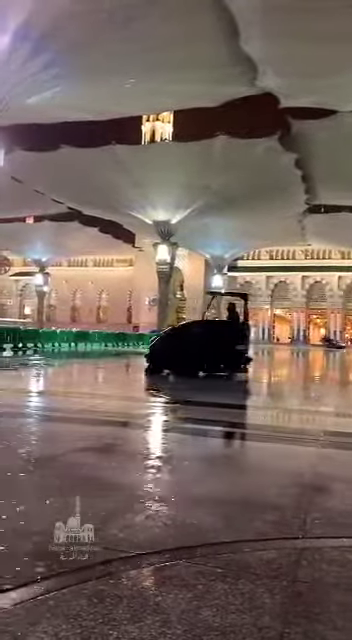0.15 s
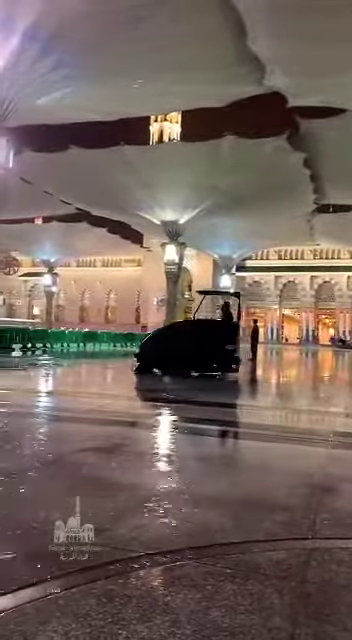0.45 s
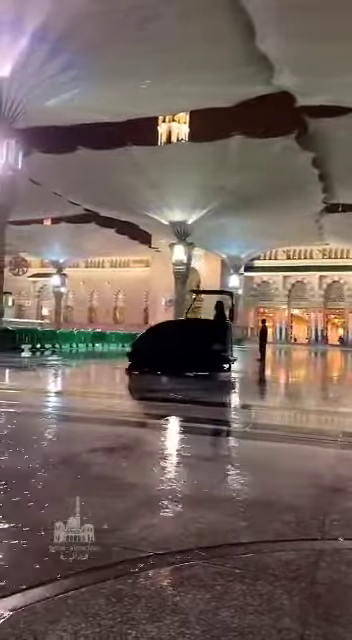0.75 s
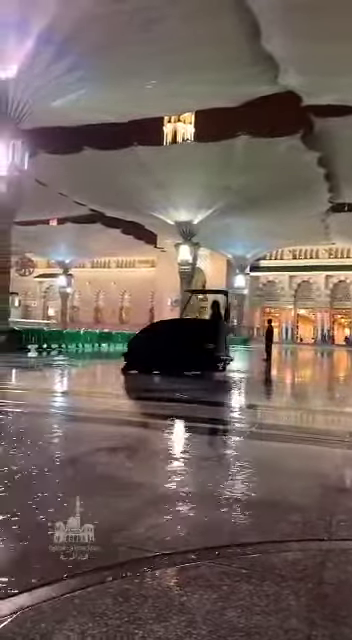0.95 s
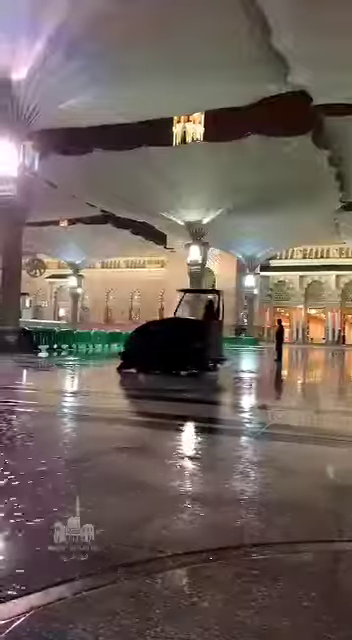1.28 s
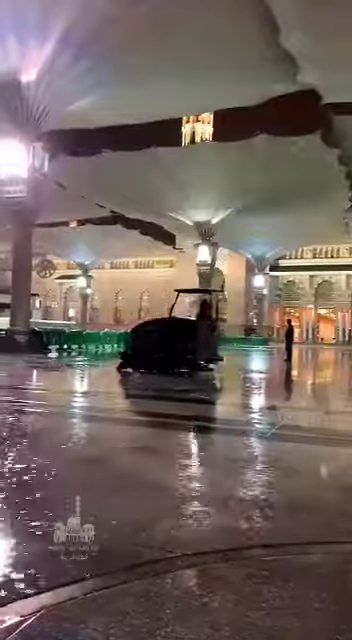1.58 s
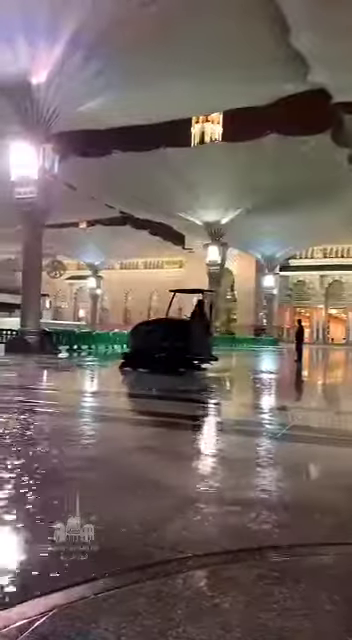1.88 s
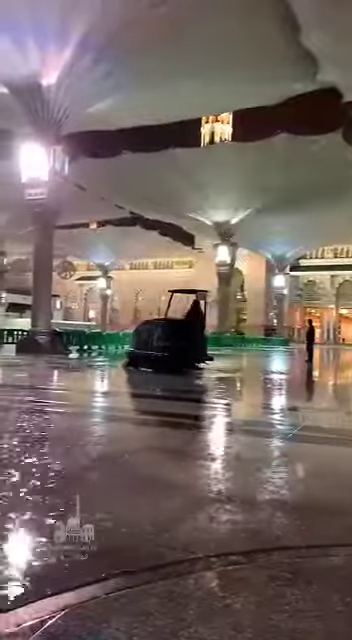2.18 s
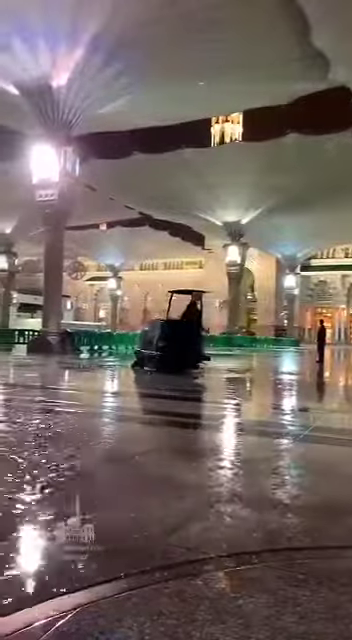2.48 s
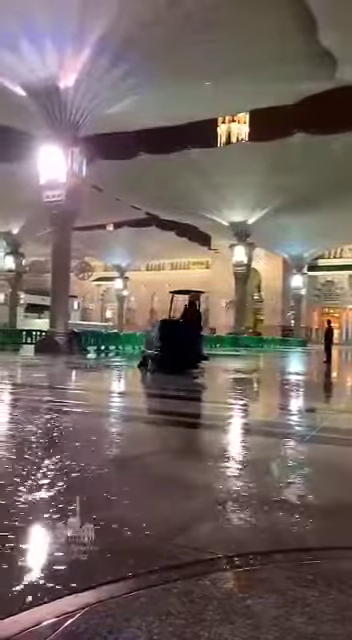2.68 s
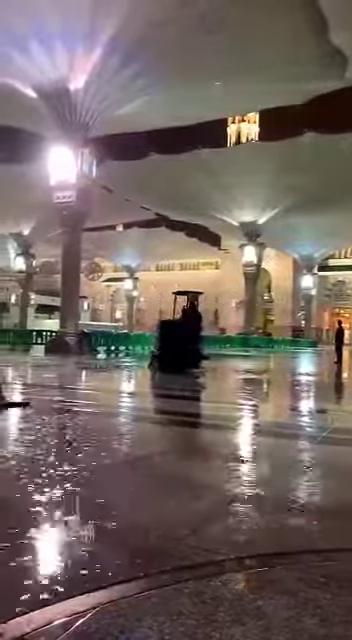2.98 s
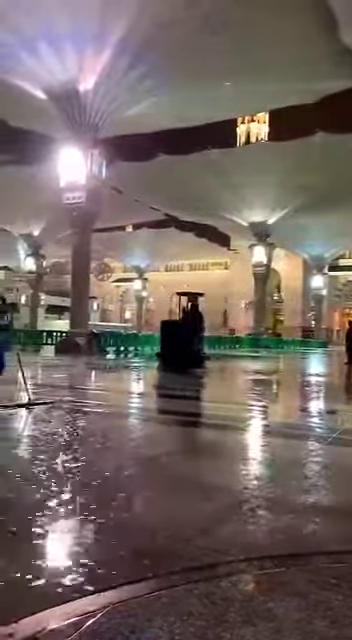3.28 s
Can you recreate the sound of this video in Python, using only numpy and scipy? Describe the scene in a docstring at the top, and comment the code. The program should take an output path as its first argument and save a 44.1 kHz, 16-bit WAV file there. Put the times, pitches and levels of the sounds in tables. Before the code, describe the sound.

Low engine drone with a beating pump and broad suction roar from a scrubber turning away on wet paving under a canopy, soft wheel rumbles midway, fine drips near a two-port microphone.

```python
"""A ride-on floor scrubber turns away across a wet paved courtyard under a wide canopy. From the start its engine
drones on twelve firing orders, a belt-driven pump beats against the fourth, a fan and thin steady electric whines
sound faintly, brushes, suction and water hiss, and drops tick nearby. The fan fades after the turn begins; the
engine sags until 1.65 s, with wheel rumbles from 0.85 s, then recovers by 2.3 s and sags again. The wash thins from
2.5 s and the loudest drop lands at 3.32 s. Two close microphone ports hear a common part and an opposite part."""
import sys
import numpy as np
from scipy import signal
from scipy.fft import rfft, irfft, next_fast_len
from scipy.io import wavfile
from scipy.ndimage import uniform_filter1d, map_coordinates

SR = 44100
rng = np.random.default_rng(int(sys.argv[2]) if len(sys.argv) > 2 else 0)


def volts_from_db(level):
    """Convert decibel levels to linear amplitude ratios."""
    exponent = np.asarray(level, float) / 20
    return 10 ** exponent


def wav_out(sig):
    """Save sig, one row per channel (or a flat mono array), as 16-bit PCM at SR to the path in sys.argv[1]."""
    wavfile.write(sys.argv[1], SR, np.round(np.clip(np.atleast_2d(sig).T, -1, 1) * 32767).astype(np.int16))


N = 152145
T = np.arange(N) / SR


def unit(x):
    """Scale to rms 1."""
    return x / np.sqrt(np.mean(x ** 2) + 1e-20)


def along(points, hz):
    """Read (frequency [Hz], value) points on a log frequency axis."""
    f, v = np.transpose(points)
    return np.interp(np.log(hz + 1), np.log(f + 1), v)


def curves(rows):
    """One value per sample for each column after the time."""
    s, *cols = np.transpose(rows)
    return [np.interp(T, s, c) for c in cols]


def wobble(rate):
    """A smooth random curve, rate knots a second."""
    return map_coordinates(rng.standard_normal(400), [T * rate])


def swell(centre_s, length_s, power=2):
    """A bell-shaped envelope, down to 1/e at length_s either side of its centre."""
    return np.exp(-((T - centre_s) / length_s) ** power)


def filtered(x, response):
    """Filter x by a complex response of frequency."""
    m = next_fast_len(N + 8192)
    return irfft(rfft(x, m) * response(np.fft.rfftfreq(m, 1 / SR)), m)[..., :N]


def patches(x, size, bins, frames, depth_db):
    """Random gain patches, so many bins high and frames long."""
    z = signal.stft(x, nperseg=size)[2]
    field = rng.standard_normal(z.shape)
    field = uniform_filter1d(field, size=bins, axis=0)
    field = uniform_filter1d(field, size=frames, axis=1)
    return signal.istft(z * volts_from_db(depth_db * unit(field)), nperseg=size)[1][:N]


def rush(spectrum, patchy_db, stripes_db):
    """Coloured noise of rms 1: brief broad patches, and narrow lasting stripes from the canopy's reflections."""
    x = patches(rng.standard_normal(N), size=512, bins=4, frames=14, depth_db=patchy_db)
    x = patches(x, size=2048, bins=2, frames=30, depth_db=stripes_db)
    return unit(filtered(x, lambda hz: volts_from_db(along(spectrum, hz))))


# Firing orders 5 to 12: one level each [dB], before fade and waver
UPPER_ORDERS = [-32, -35, -39, -38, -35, -40, -40, -39]


def firing_pulses(turn, order_db, fade_db):
    """Twelve firing orders nearly in step make one pulse a cycle."""
    second_db, third_db, fourth_db = order_db
    first_db = -22 + fade_db + 2.1 * wobble(5.9)
    levels_db = [db + 0.2 * wobble(8.2) for db in (first_db, second_db, third_db)]
    levels_db.append(fourth_db)
    # the upper orders come and go
    levels_db += [db + fade_db + 2.2 * wobble(4) for db in UPPER_ORDERS]
    pulses = 0
    for order, db in enumerate(levels_db, 1):
        phase_waver = (.15 if order == 4 else .45) * wobble(8)  # radians
        pulses = pulses - volts_from_db(db) * np.cos(order * turn + phase_waver)
    return pulses


def pump(turn, pump_db):
    """The belt-driven pump runs just above four times the firing rate, so it beats with the fourth order."""
    ratio, start_turns = 4.0919, .37
    return volts_from_db(pump_db) * np.cos(ratio * turn + 2 * np.pi * start_turns)


def fan(turn):
    """The fan whine follows the engine speed and faces away after the turn begins."""
    level = volts_from_db(-25.5 + 2.2 * wobble(8.98)) * swell(.5, 0.94, power=4)
    return level * np.cos(6.41 * turn + 0.83 * wobble(14))


def exhaust_pipe(x):
    """The pipe's open end turns the phase of what lies below its cut and leaves levels alone."""
    cut_hz = 84
    return filtered(x, lambda f: np.exp(1j * np.angle(-1 / (cut_hz ** 2 - f * f + 1j * f * cut_hz / 2))))


# Engine, its orders swelling and fading in the standing waves under the canopy: (time [s], firing rate [Hz],
# 2nd order level [dB], 3rd order level [dB], 4th order level [dB], pump level [dB])
ENGINE_COURSE = [(0, 64.26, -14.5, -21.5, -25, -22.5), (.15, 64.5, -12, -16, -22.5, -31.5),
                 (.42, 64.63, -13, -15.5, -23.5, -29), (.7, 63.55, -19, -18, -22, -26),
                 (1.0, 62.92, -15, -17, -20, -23.5), (1.3, 61.36, -15.5, -18.5, -18, -23.5),
                 (1.65, 60.51, -14.5, -20, -19.5, -20.5), (1.92, 61.0, -19.5, -14, -26.5, -23),
                 (2.0, 61.34, -17, -17, -22.5, -18), (2.23, 64.44, -16.5, -18, -26, -24),
                 (2.33, 64.74, -10.5, -22, -21.5, -31), (2.47, 64.7, -21.5, -21, -21.5, -33),
                 (2.58, 64.48, -18.5, -17, -32, -32), (2.68, 63.76, -19, -26, -24, -31),
                 (2.92, 63.07, -19, -18, -23, -27), (3.03, 62.46, -19, -22, -22, -22.5),
                 (3.28, 61.15, -29, -16.5, -25.5, -21.5), (3.45, 61.7, -22.5, -21, -28.5, -28)]


def engine():
    """Pulses, pump and fan share one shaft angle, the running sum of the firing rate."""
    hz, *order_db, pump_db = curves(ENGINE_COURSE)
    turn = 2 * np.pi * np.cumsum(hz) / SR
    fade_db = -.9 * (T - T.mean())
    piped = exhaust_pipe(firing_pulses(turn, order_db, fade_db) + pump(turn, pump_db))
    return np.sqrt(2) * (piped + fan(turn))  # root 2 makes the levels rms


# Wash: (time [s], roar level [dB], brush level [dB], water hiss level [dB]), before each layer's trim
WASH_COURSE = [(0.0, -24.5, -30.5, -28.5), (0.2, -24, -29.5, -28.5), (1.08, -23, -29.5, -31),
               (1.13, -24, -31.5, -29.5), (1.62, -23.5, -30, -31), (2.16, -24, -31, -31),
               (2.52, -26, -34, -35), (2.53, -26.5, -33.5, -34), (3.02, -25, -35, -34.5),
               (3.23, -26.5, -35, -35), (3.28, -24, -40, -35.5), (3.32, -25.5, -33.5, -34.5),
               (3.43, -29.5, -39.5, -36.5), (3.45, -29, -32, -38)]


def wash_levels():
    """The shared level courses of roar, brushes and water."""
    return curves(WASH_COURSE)


# Roar colour: (frequency [Hz], relative level [dB])
ROAR_COLOUR = [(20, -29.5), (40, -12), (52, 0.5), (90, -1.5), (155, -2), (220, -1), (350, -7.5),
               (460, -11.5), (740, -12), (830, -13), (950, -12.5), (1300, -18.5), (2000, -34.5),
               (3000, -90)]


def roar(level_db):
    """The low roar is noise with a gentle level waver."""
    trim_db = 7.5
    return volts_from_db(level_db + trim_db + .25 * wobble(6)) * rush(ROAR_COLOUR, patchy_db=1.12, stripes_db=2.0)


# Brush colour: (frequency [Hz], relative level [dB])
BRUSH_COLOUR = [(500, -61), (1100, -7), (1500, -5), (1850, -1), (2080, -10.5), (2400, -33), (3000, -67.5)]


def brushes(level_db):
    """Bristles scrubbing the paving: noise in the middle of the range."""
    trim_db = 0.9
    return volts_from_db(level_db + trim_db) * rush(BRUSH_COLOUR, patchy_db=1.1, stripes_db=2.2)


# Water hiss colour: (frequency [Hz], relative level [dB])
WATER_COLOUR = [(1500, -48.5), (1950, -13), (2150, -2.5), (2450, -1), (3000, -0.5), (4200, -8),
                (5000, -16.5), (5600, -21.5), (6200, -33.5), (7000, -42.5), (15000, -44.5)]


def water(level_db):
    """Water hisses as noise in the lower treble."""
    trim_db = 0.5
    return volts_from_db(level_db + trim_db) * rush(WATER_COLOUR, patchy_db=1.42, stripes_db=2.0)


# Colour of the wash in opposite phase at the ports: (frequency [Hz], relative level [dB])
WIDE_COLOUR = [(20, -28), (40, -6), (70, -0.5), (130, 0), (220, -2), (460, -6), (1000, -10.5), (1700, -20),
               (2650, -17.5), (3300, -23), (4500, -24.5), (5700, -22), (9000, -28.5), (12000, -35),
               (15200, -38.5)]


def wide_wash(hiss_db):
    """Broad noise in opposite phase, following the water hiss at 0.7 of its swing in dB."""
    mean_db = hiss_db.mean()
    level_db = .7 * (hiss_db - mean_db) + mean_db + 7
    return volts_from_db(level_db) * rush(WIDE_COLOUR, patchy_db=1.1, stripes_db=2.5)


# Thin treble colour: (frequency [Hz], relative level [dB])
THIN_COLOUR = [(4000, -21), (5400, 6), (6300, -12.5), (7000, -31), (11000, -6), (13000, -6.5), (14200, 5),
               (15500, -7.5)]


def thin_hiss(level_db, patchy_db, stripes_db):
    """A thin hiss in the treble at a steady overall level."""
    return volts_from_db(level_db) * rush(THIN_COLOUR, patchy_db, stripes_db)


# Faint electric whines: (pitch [Hz], centre time [s], half length [s], level [dB])
WHINE_TONES = [(510, .18, .08, -26), (495, .8, .35, -29), (903, 1.58, .36, -27), (2590, 1.3, .2, -41),
               (3079, .6, .5, -46), (3040, 2.97, .06, -37), (3730, 1.0, .8, -50)]


def electric_whines():
    """Thin tones that keep their pitch whatever the engine speed, swell and fade."""
    total = 0
    for hz, s, length, db in WHINE_TONES:
        level = np.sqrt(2) * volts_from_db(db + 1.3 * wobble(9)) * swell(s, length)
        total = total + level * np.cos(2 * np.pi * hz * T + 0.24 * wobble(7.5))
    return total


# Loudest drops: (time [s], starting level [dB], pitch [Hz])
LOUD_DROPS = [(.418, -18.5, 6970), (.88, -22, 7050), (1.373, -21, 6470), (3.281, -25.5, 4100),
              (3.324, -9.5, 12230), (3.368, -30.5, 13000)]


def drops():
    """Water drops tick on the paving as short decaying sines: a few loud ones over a random patter."""
    per_s, floor_db, decay_cycles = 150, -38, 1.2
    u = rng.random((600, 4))[:int(per_s * N / SR)]
    patter_s = u[:, 0] * (N - 1) / SR
    patter_db = floor_db - 2.6 * np.log(u[:, 1] + .003)  # mostly faint, now and then stronger
    patter_hz = 3000 * 4.5 ** u[:, 2]
    patter = np.c_[patter_s, patter_db, patter_hz]
    s, db, hz = np.r_[patter, np.array(LOUD_DROPS)].T[:, :, None]
    k = np.arange(64)
    decay = np.exp(-k / SR * hz / decay_cycles)
    ticks = volts_from_db(db) * decay * np.sin(2 * np.pi * hz * k / SR)
    places = np.round(s * SR).astype(int) + k
    return np.bincount(places.ravel(), ticks.ravel(), N + 64)[:N]


# Rumbles as wheels cross joints: (centre time [s], half length [s], pitch [Hz], level [dB])
WHEEL_RUMBLES = [(0.847, 0.033, 94, -23.5), (1.811, 0.023, 95.6, -18.5), (1.858, .04, 76.3, -18),
                 (1.897, .02, 94.5, -14), (1.948, 0.037, 82.2, -14), (2.919, 0.035, 84.4, -18.5),
                 (3.032, 0.038, 90.5, -20.5)]


def wheels():
    """Wheels crossing joints make short soft low thuds, each a sine in a bell envelope."""
    total = 0
    for s, length, hz, db in WHEEL_RUMBLES:
        total = total + np.sqrt(2) * volts_from_db(db) * swell(s, length) * np.sin(2 * np.pi * hz * (T - s))
    return total


# Share of the common sound leaning to one port, in phase: (frequency [Hz], share [ratio])
LEAN_SHARE = [(40, .01), (100, -0.092), (200, -0.055), (350, -0.18), (800, -.12), (1700, -.04),
              (2650, -0.057), (4200, .04)]
# The same, a quarter cycle apart: (frequency [Hz], share [ratio])
LAG_SHARE = [(40, .03), (65, 0.15), (155, -0.057), (460, 0.11), (1000, 0.11), (1400, -.02), (2650, -.35),
             (3400, -.1), (5000, -.3)]


def port_lean(mid):
    """The common sound reaches the two ports with slightly different level and phase."""
    return filtered(mid, lambda hz: along(LEAN_SHARE, hz) + 1j * along(LAG_SHARE, hz))


def scene():
    """Add the common part to the opposite part for one port, subtract it for the other."""
    roar_db, brush_db, hiss_db = wash_levels()
    ticks = drops()
    mid = engine() + roar(roar_db) + brushes(brush_db) + water(hiss_db)
    mid = mid + thin_hiss(-56, patchy_db=4.5, stripes_db=4.5)
    mid = mid + electric_whines() + volts_from_db(-11.5) * ticks + wheels()
    side = wide_wash(hiss_db) + thin_hiss(-54, patchy_db=-2.5, stripes_db=1.5)
    side = side + ticks + port_lean(mid)
    return np.array([mid + side, mid - side])


def low_pass(x):
    """Removes everything above the highest recorded frequency."""
    return signal.sosfilt(signal.butter(12, 15500, fs=SR, output="sos"), x)


def record(dry):
    """Band limit, then soft clipping at full scale."""
    x = filtered(dry, lambda hz: hz < 15500)
    x = x / (1 + np.abs(x) ** 8) ** (1 / 8)
    return low_pass(x)


dry = scene()
out = record(dry)
wav_out(out)
```